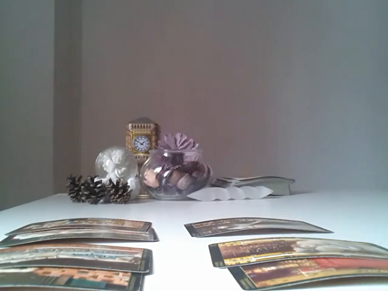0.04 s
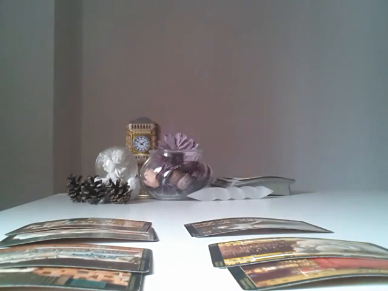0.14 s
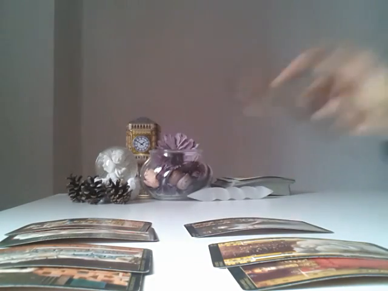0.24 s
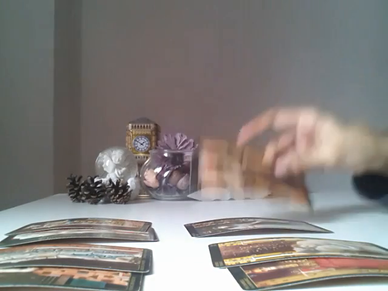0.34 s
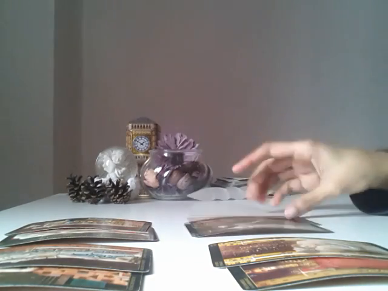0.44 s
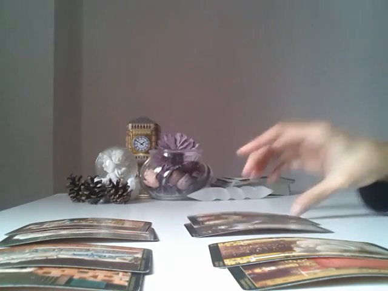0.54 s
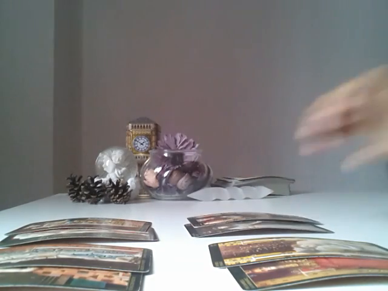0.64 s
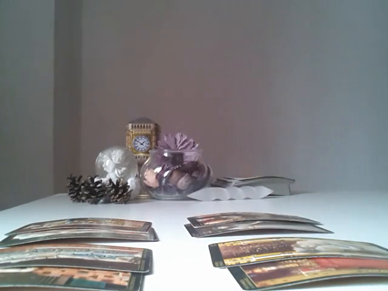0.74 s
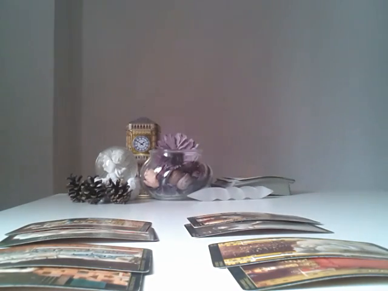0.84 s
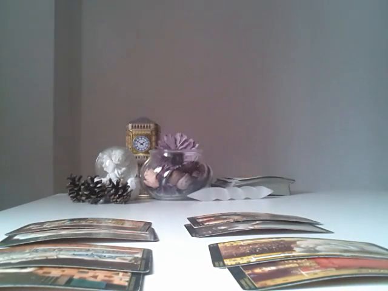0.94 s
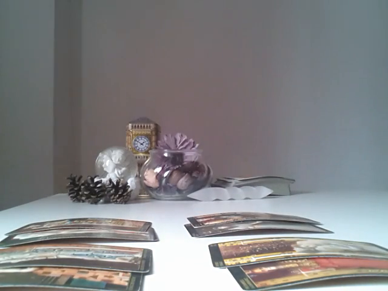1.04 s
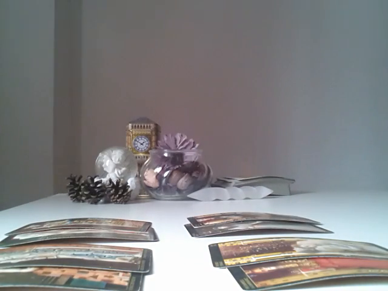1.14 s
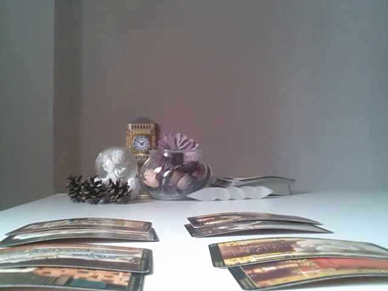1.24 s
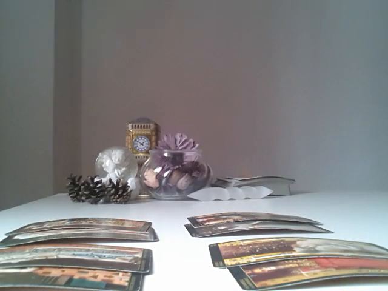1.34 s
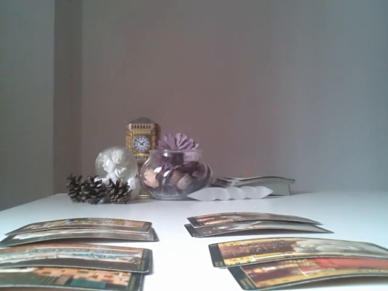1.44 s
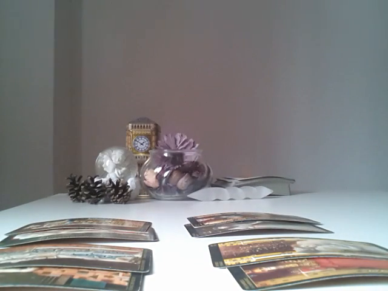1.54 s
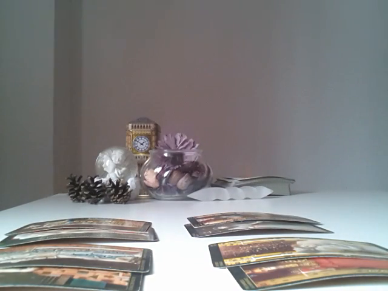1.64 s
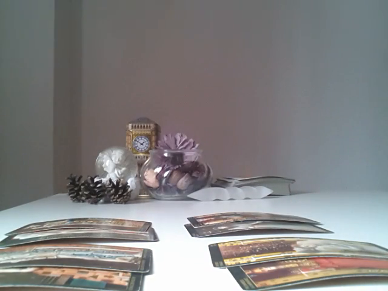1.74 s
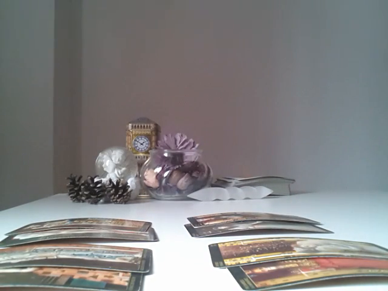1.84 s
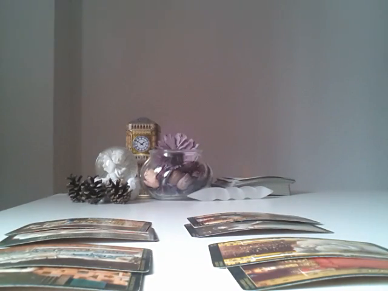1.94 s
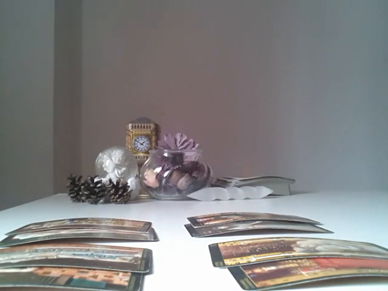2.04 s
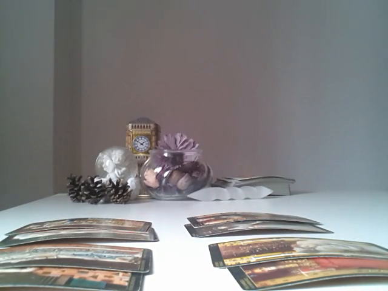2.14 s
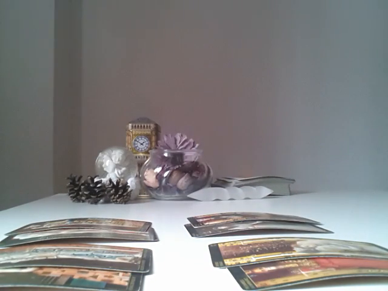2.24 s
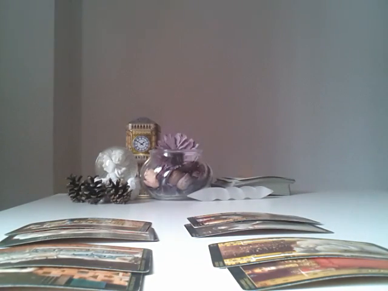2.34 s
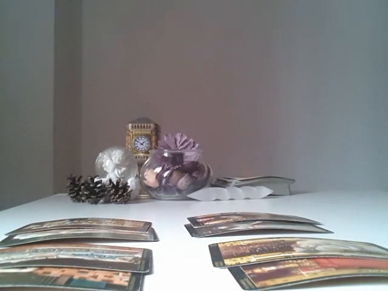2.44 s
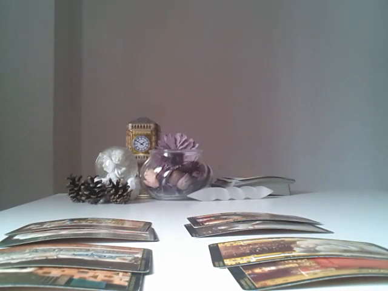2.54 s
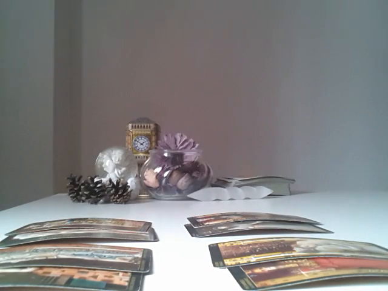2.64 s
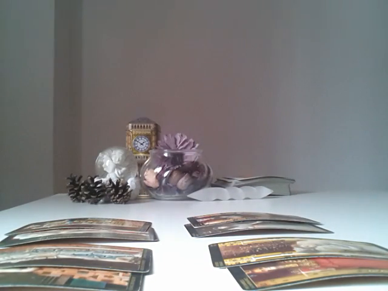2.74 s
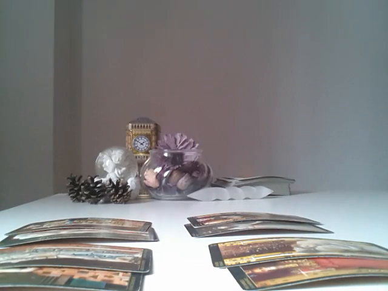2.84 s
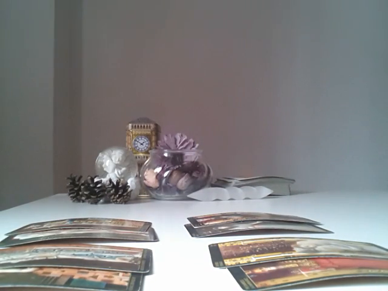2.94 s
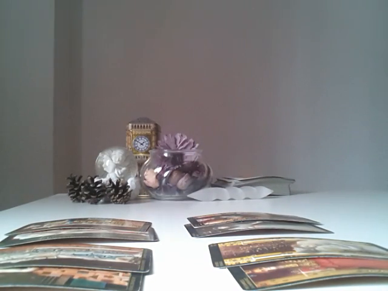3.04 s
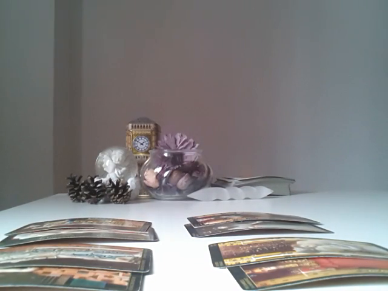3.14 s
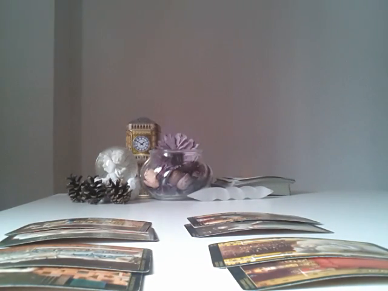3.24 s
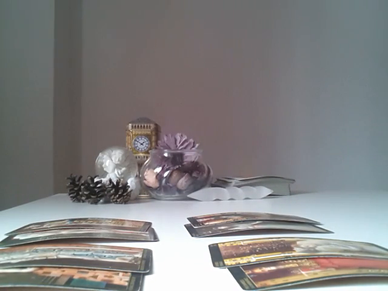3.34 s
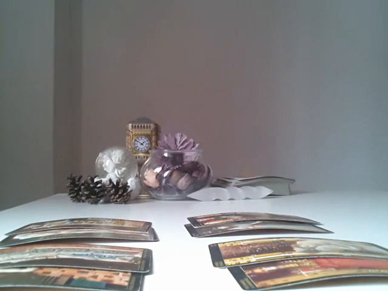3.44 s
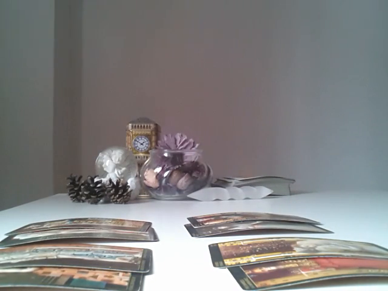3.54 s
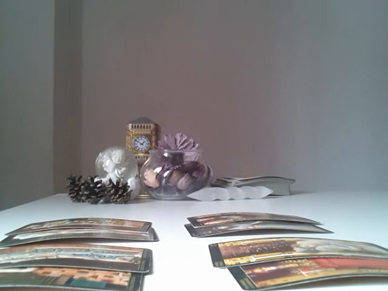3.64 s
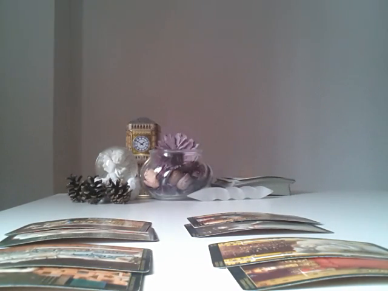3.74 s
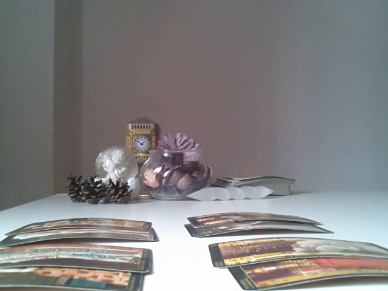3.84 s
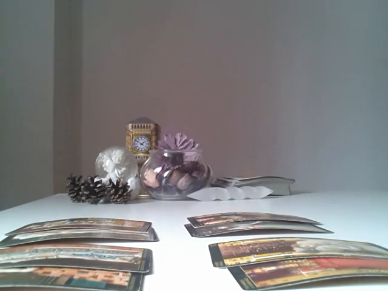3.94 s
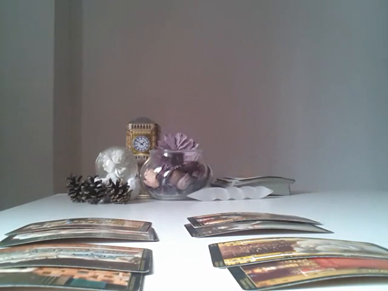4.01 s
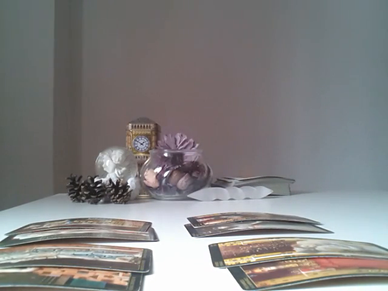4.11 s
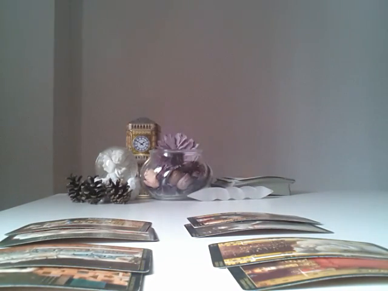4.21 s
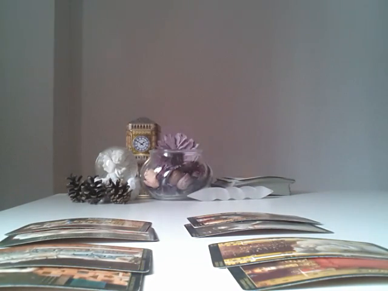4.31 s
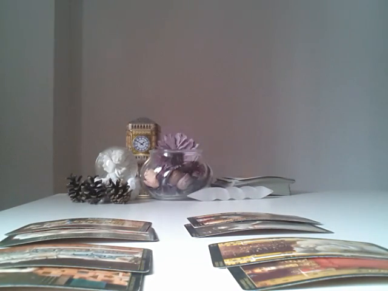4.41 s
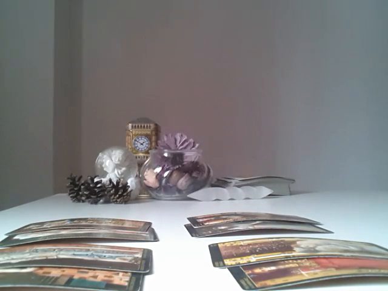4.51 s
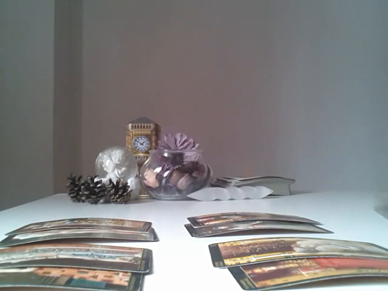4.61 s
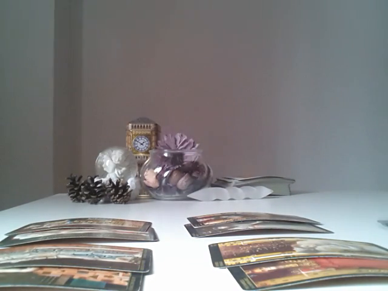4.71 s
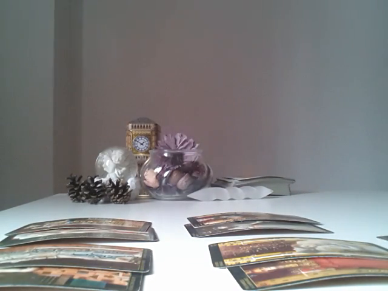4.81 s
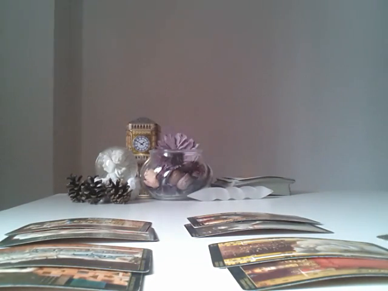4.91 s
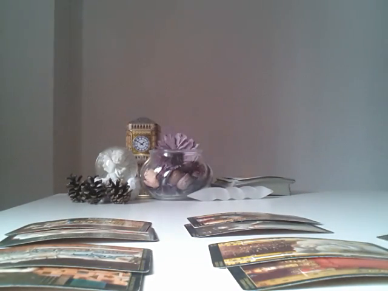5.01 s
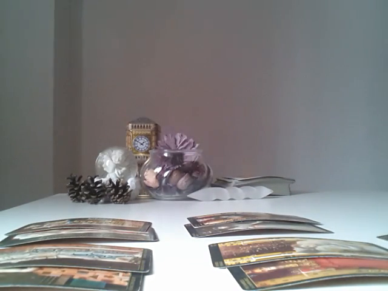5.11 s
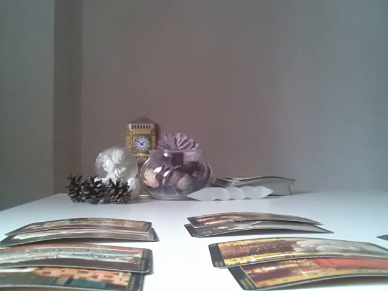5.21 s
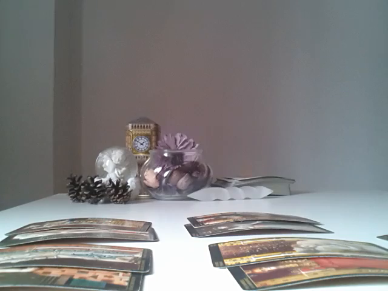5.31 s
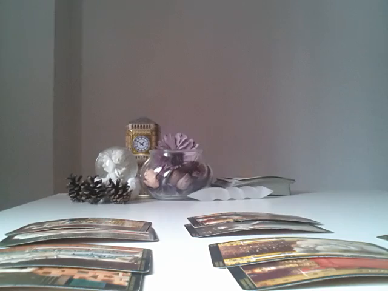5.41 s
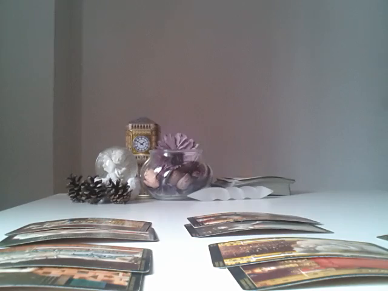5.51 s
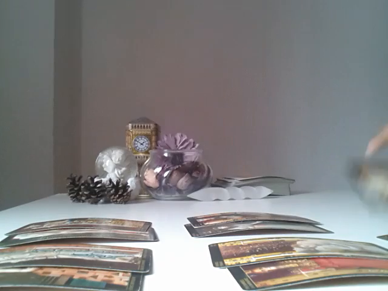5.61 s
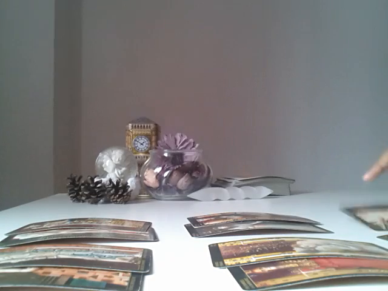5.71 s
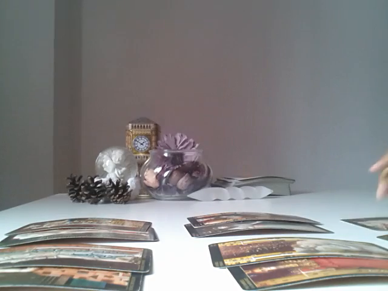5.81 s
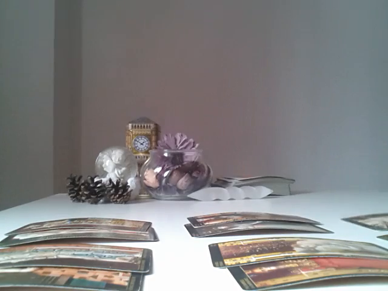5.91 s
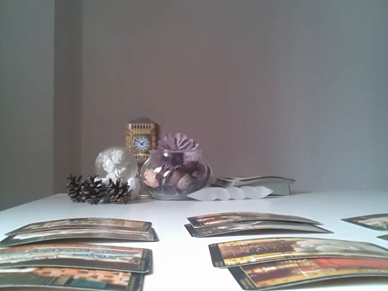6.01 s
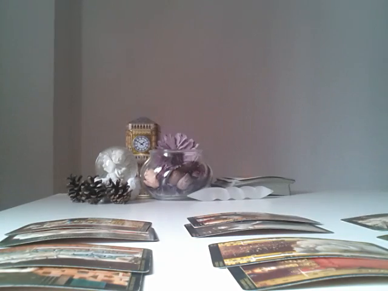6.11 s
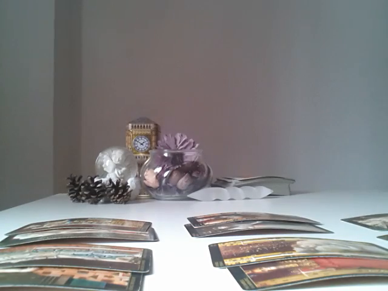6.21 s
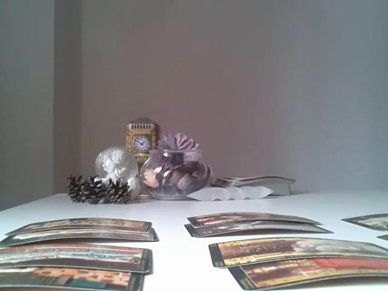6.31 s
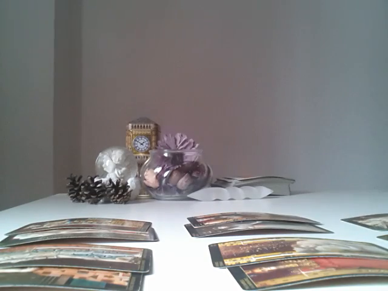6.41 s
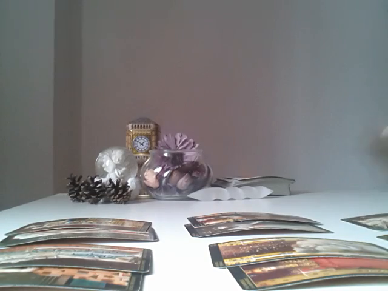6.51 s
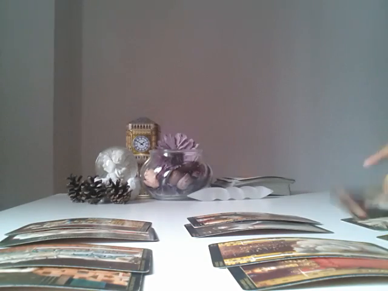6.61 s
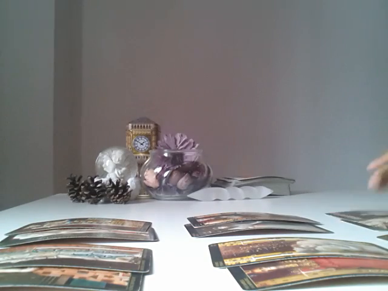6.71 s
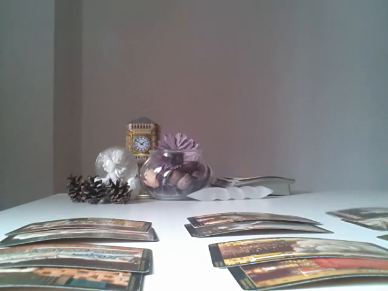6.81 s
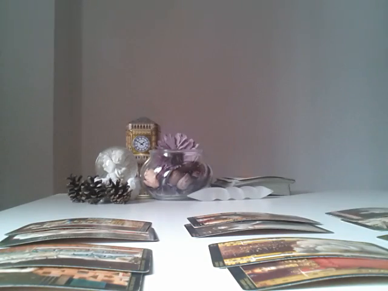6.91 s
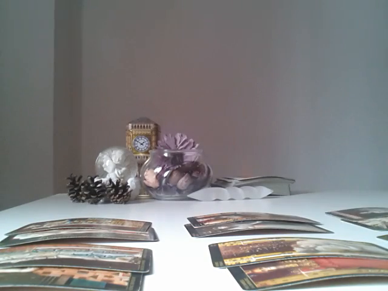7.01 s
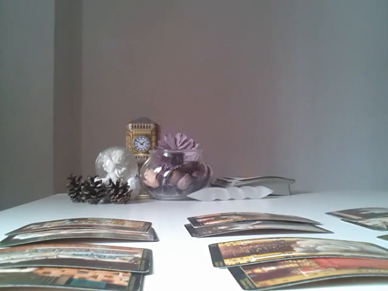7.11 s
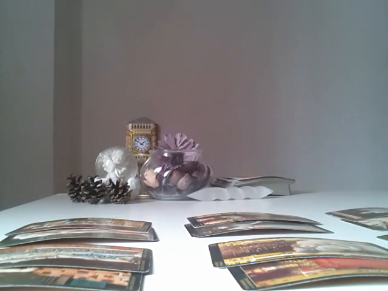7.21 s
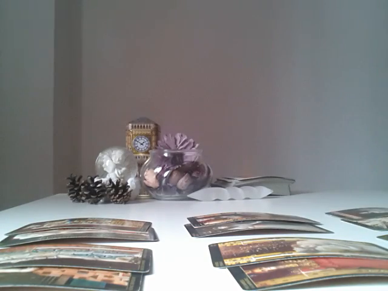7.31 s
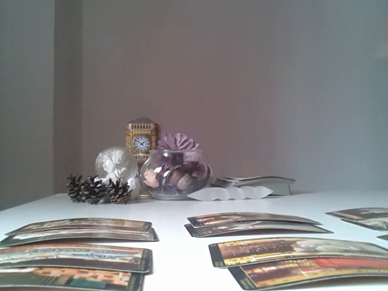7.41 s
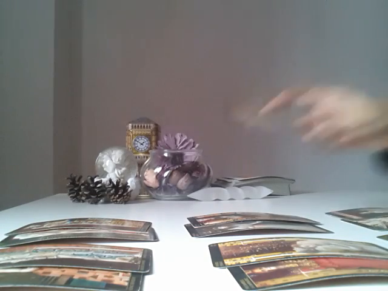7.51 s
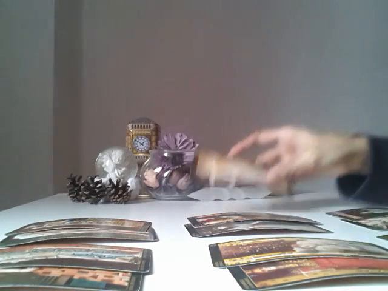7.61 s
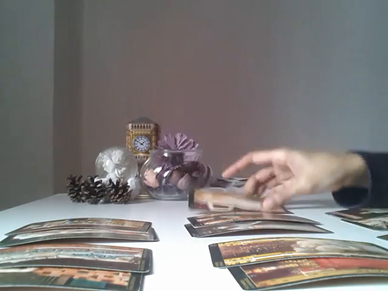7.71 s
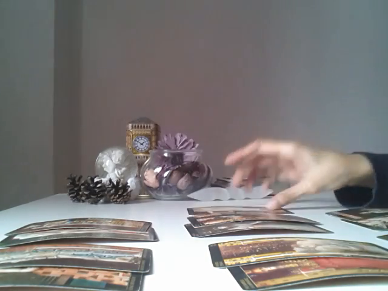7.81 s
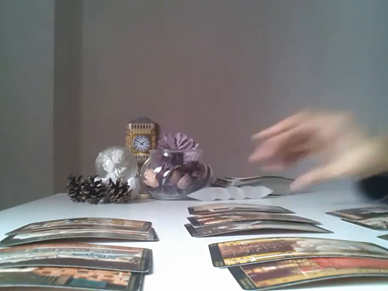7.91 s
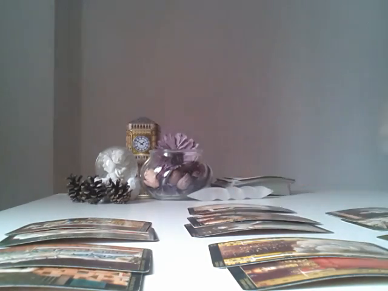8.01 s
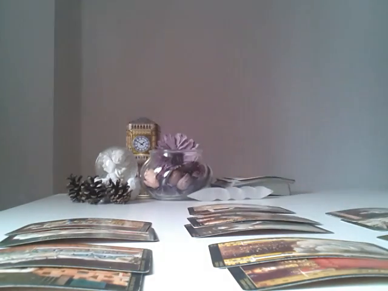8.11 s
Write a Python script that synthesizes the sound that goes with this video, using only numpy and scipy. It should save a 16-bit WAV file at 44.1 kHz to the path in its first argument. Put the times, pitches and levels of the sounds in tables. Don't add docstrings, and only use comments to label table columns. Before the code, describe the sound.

Stiff cards are drawn from a deck and laid on a hard table, with sharp snaps, papery scuffs and soft hollow knocks in a quiet small room.

```python
import sys
import numpy as np
from scipy import signal
from scipy.fft import rfft, irfft, next_fast_len
from scipy.io import wavfile
from scipy.ndimage import uniform_filter1d, minimum_filter1d

SR = 44100
rng = np.random.default_rng(int(sys.argv[2]) if len(sys.argv) > 2 else 0)


def wav_record(signal):
    frames = np.transpose(np.atleast_2d(signal))
    bounded = np.clip(frames, -1, 1)
    quanta = np.round(bounded * 32767).astype(np.int16)
    wavfile.write(sys.argv[1], SR, quanta)


def level_to_linear(level):
    exponent = np.asarray(level, float) / 20
    return 10 ** exponent


N = 359415

# freq_hz, level_db_per_hz
FLOOR_SPECTRUM = [(30, -11.5), (110, -48), (206, -21.5), (470, -14), (690, -18.5), (1430, -20.5),
                  (10800, -22.5), (16500, -22.5)]
# freq_hz, correlation
FLOOR_LIKENESS = [(60, 0.014), (300, 0.48), (1200, 0.51)]
# start_s, peak_db, pitch_hz, t60_s
KNOCKS = [
    (0.059, -35.5, 400, .03),
    (.073, -41.5, 422, .03),
    (1.428, -27.5, 370, 0.009),
    (2.36, -35, 470, .03),
    (2.388, -36.5, 438, 0.043),
    (2.43, -45.5, 456, 0.018),
    (3.782, -31.5, 478, .2),
    (3.83, -38.5, 446.6, .2),
    (4.428, -44.5, 425, 0.048),
    (5.36, -41, 445, 0.057),
]
# fastest_s, rub_db, cavity_hz, rise_ms_per_20db, fall_ms_per_20db
TABLE_SLIDES = [(.07, -43.5, 2500, 118, 79.4), (0.448, -33, 1800, 17, 86.4), (1.13, -55.5, 4930, 37, 120),
                (1.183, -35, 4800, 27, 35.3), (1.801, -40.5, 5900, 123, 40.3),
                (1.957, -43.5, 5100, 7.1, 35.19), (2.637, -41.5, 5800, 11, 205.2),
                (2.765, -44, 2300, 120, 64.8), (.51, -35.5, 6000, 74, 164),
                (3.262, -51.5, 5500, 9.7, 67.59), (3.361, -42.5, 2220, 41, 75.6),
                (3.692, -42, 2030, 36, 92.59), (3.78, -39, 2200, 9, 150), (4.654, -39, 1900, 22, 97),
                (4.77, -31.5, 2610, 28, 103), (5.353, -46, 3700, 10, 59.4), (5.387, -43.5, 4320, 45, 73.4),
                (5.698, -45.5, 2180, 36, 268), (5.932, -42, 1600, 12.3, 35.19),
                (6.337, -38, 2900, 29.4, 38.2), (6.62, -44.5, 3880, 15, 216), (6.698, -36, 2300, 11, 121),
                (7.294, -49, 5070, 49, 67.59), (7.76, -39.5, 3490, 46, 136)]
# fastest_s, rub_db, cavity_hz,
# rise_ms_per_20db, fall_ms_per_20db
DECK_SLIDES = [(0.424, -36.5, 2080, 4, 90), (3.16, -62, 6300, 37, 71), (.921, -58, 5900, 34, 36),
               (1.39, -54, 5500, 40, 150), (1.505, -43.5, 2200, 6, 170), (1.637, -43.5, 2200, 150, 140),
               (2.14, -65, 6600, 9.9, 90), (2.233, -53, 4850, 3.6, 98), (2.355, -36.5, 4750, 30, 17),
               (2.458, -40.5, 5270, 165, 22), (2.966, -53.5, 2350, 67, 40), (3.969, -49, 1540, 29, 58),
               (4.393, -44, 3075, 36, 120), (4.481, -45.5, 5020, 56, 49), (7.88, -40, 4000, 40, 128),
               (5.78, -42, 5200, 55, 60), (1.045, -64.5, 3020, 29, 62), (5.445, -39.5, 2760, 70, 51),
               (5.822, -37.5, 4660, 52, 30), (6.404, -42.5, 4040, 43, 32), (6.668, -41, 4000, 50, 30),
               (7.142, -59.5, 5450, 21, 68), (7.367, -45.5, 6300, 51, 32), (7.698, -40.5, 2710, 7.4, 246)]
# fastest_s, rub_db, cavity_hz, table_over_rub_db
SKIDS = [
    (0.11, -29.5, 3800, -10.5),
    (1.245, -31, 4630, -16.5),
    (1.503, -38, 2370, -22),
    (2.814, -32, 5500, -3),
    (3.467, -32.5, 3030, -4),
    (3.768, -30, 4100, 0.5),
    (6.691, -25.5, 5860, -4),
    (7.849, -34, 6270, -11),
]
# freq_hz, level_db_per_hz
RUB_SPECTRUM = [(530, -27.5), (900, -13.5), (1040, -11.5), (2600, -4), (3680, -9.5), (9310, -11.5),
                (14000, -26.5), (16000, -62.5)]
# pitch_hz, width_hz, level_db
TABLE_MODES = [(339.6, 60, -6), (462, 83, -0.5), (771, 405, 1), (964, 255, 4.5), (1453, 410, -0.5)]
# time_s, left_lags_right_us
HAND_PATH = [(.3, 340), (.4, 30), (.7, 30), (.9, 350), (3.55, 320), (3.65, 210), (4.9, 180), (5.3, 260),
             (5.6, 170), (6.2, 180), (6.3, 290), (6.55, 160), (7.4, 220), (7.6, 30), (7.85, -60)]
# start_s, peak_db, table_thud_db, ring_hz
SCUFFS = [(0.1127, -17, -9.5, 3200), (1.1837, -17.5, -9.5, 1950), (1.252, -27, -16, 7100),
          (2.35, -25.5, -12, 4670), (2.6431, -25, -12, 5800), (2.9129, -32.5, -32, 2015),
          (3.256, -31.5, -22, 5880), (3.356, -27.5, -10.5, 3220), (3.4075, -30.5, -8, 5230),
          (3.448, -39, -15, 5005), (3.4713, -21, -10, 2840), (3.766, -10.5, -33.5, 4240),
          (4.6521, -20.5, -3, 4670), (4.66, -27.5, -4.5, 2800), (4.764, -18, -7, 6100),
          (5.4384, -23, -14.5, 2300), (5.8159, -22.5, -1, 4600), (5.925, -31.5, -9, 5900),
          (5.939, -31.5, -9, 3700), (7.7335, -25, -6, 2500)]
# start_s, peak_db, table_thud_db, ring_hz
SNAPS = [(0.4205, -16, -13.5, 3710), (0.4365, -7, -6, 3200), (0.4513, -20.5, -16.5, 3100),
         (0.479, -5, -16, 2230), (0.496, -6.5, -9.5, 5300), (0.509, -19.5, -34.5, 6500),
         (1.2419, -27.5, -9.5, 3900), (1.5011, -25.5, -26, 2390), (1.637, -23, -15, 2620),
         (1.7439, -21.5, -17, 2700), (1.9503, -15.5, -22.5, 5700), (1.9559, -23.5, -11, 3000),
         (2.807, -5.5, -18.5, 2510), (2.956, -32.5, -11.5, 2400), (3.3829, -34.5, -8, 1980),
         (3.675, -27, -12.5, 4386), (3.686, -23.5, -10.5, 2750), (4.7051, -20.5, -1, 4510),
         (4.783, -9, -10, 5600), (5.6779, -18, -12.5, 2410), (5.6897, -22.5, -6, 3940),
         (5.8246, -24.5, -2, 4900), (6.3289, -26.5, -12.5, 3070), (6.6208, -18.5, -14.5, 1800),
         (6.628, -27.5, -7, 5000), (7.364, -26, -30, 6080), (7.6942, -14, -14, 3760),
         (7.722, -22, -6, 1850), (7.829, -26, -3.5, 2900), (2.801, -19.5, -14, 3990)]
# start_s, peak_db, table_thud_db, ring_hz, scatter_ms
CRACKS = [(0.501, -11, -4.5, 3400, 1.7), (1.4272, -18.5, -20, 2090, 2.2), (1.4978, -16, -20.5, 2500, 5.1),
          (1.8186, -14.5, -17, 3430, 5.8), (2.823, -13.5, -13, 5760, 4.5), (1.9692, -37, -13.5, 6500, 6.1),
          (2.6305, -3, -28, 5600, 0.87), (2.6572, -21, -13, 5200, 5.2), (2.6923, -59, -18, 2300, 7.1),
          (2.7055, -33.5, -5, 6300, 6.2), (3.398, -37.5, -15.5, 1900, 5), (3.737, -13, -29, 5050, 2.8),
          (3.756, -21, -50, 4200, 6.7), (3.7698, -2.5, -12.5, 4220, 2), (4.6252, -10.5, -21, 6900, 2.44),
          (4.7799, -9.5, -15, 2500, 6.9), (6.3395, -36.5, -15.5, 3000, 6.5),
          (6.6119, -19.5, -9.5, 3900, 6.1), (6.6788, -16.5, -14, 5460, 4.4), (6.6862, -13, -32, 2270, 4.7),
          (7.8421, -1.5, -19, 3060, 3), (7.8442, 0.5, -22.5, 6060, 0.84), (7.856, -6, -36.5, 6320, 5.5)]
# freq_hz, t60_s
ROOM_DECAY = [(200, 0.47), (1000, 0.29), (4000, 0.23), (12000, 0.33)]
# freq_hz, level_db
TREBLE_END = [(14400, -1), (14900, -29.5), (16400, -35.5), (16800, -120)]

SNAP_SCATTER_MS, SCUFF_SCATTER_MS = 12, 38
SKID_RISE_MS, SKID_FALL_MS = 21, 17.3
TABLE_SLIDE_DB, DECK_SLIDE_DB = -6.5, -14
LIFT = 0.19


def unit(x):
    return x / np.sqrt(np.mean(x ** 2) + 1e-20)


def along(points, hz):
    f, v = np.transpose(points)
    return np.interp(np.log(hz + 1), np.log(f + 1), v)


def hiss():
    m = next_fast_len(N)
    f = np.fft.rfftfreq(m, 1 / SR)
    angle = np.arccos(np.clip(along(FLOOR_LIKENESS, f), -1, 1)) / 2
    noise = rfft(rng.standard_normal((2, m))) * level_to_linear(along(FLOOR_SPECTRUM, f))
    mid, side = irfft(noise * [np.cos(angle), np.sin(angle)], m)[:, :N]
    return unit(np.array([mid + side, mid - side]))


def suppressor(x, open_db, depth_db, soft_db):
    power = np.abs(uniform_filter1d(np.mean(x ** 2, axis=0), size=200))
    held = -minimum_filter1d(-power, size=800, origin=-80)
    over = (10 * np.log10(held + 1e-12) - open_db) / soft_db
    gain_db = depth_db * (np.tanh(over) - 1) / 2
    return level_to_linear(uniform_filter1d(gain_db, size=100))


def knocks():
    t = np.arange(N) / SR
    rattle = level_to_linear(3 * unit(uniform_filter1d(rng.standard_normal(N), size=300)))
    notes = np.zeros(N)
    for start_s, peak_db, hz, t60_s in KNOCKS:
        decay = level_to_linear(peak_db - 60 * np.abs(t - start_s) / t60_s)
        notes -= decay * np.sin(2 * np.pi * hz * np.clip(t - start_s, 0, 1))
    return rattle * notes


def resonance(f, hz, width):
    return 1j * f * width / (hz * hz - f * f + 1j * f * width)


def table_top(f):
    return sum((-1) ** k * level_to_linear(db) * resonance(f, hz, width_hz)
               for k, (hz, width_hz, db) in enumerate(TABLE_MODES))


def placed(f, s):
    lag_us = np.interp(s, *np.transpose(HAND_PATH))
    shadow_db = -.02 * lag_us * f / (f + 900)
    half = level_to_linear(shadow_db / 2) * np.exp(-1j * np.pi * f * lag_us / 10 ** 6)
    return np.array([half, 1 / half])


def strokes(t):
    rows = [(*r, TABLE_SLIDE_DB) for r in TABLE_SLIDES]
    rows += [(*r, DECK_SLIDE_DB) for r in DECK_SLIDES]
    rows += [(s, db, hz, SKID_RISE_MS, SKID_FALL_MS, table_db) for s, db, hz, table_db in SKIDS]
    s, db, hz, rise_ms, fall_ms, table_db = [c[:, None] for c in np.transpose(rows)]
    side_ms = np.clip(np.where(t < s, rise_ms, fall_ms), 2, 900)
    fade = np.abs(t - s) * 1000 / side_ms
    power = level_to_linear(np.clip(db - 20 * fade * (1 + LIFT * fade), -200, 0)) ** 2
    rub = power.sum(0)
    table = (power * level_to_linear(table_db) ** 2).sum(0)
    return np.sqrt(rub), np.sqrt(table), (power * hz).sum(0) / rub


def slides():
    flutter_db = 2.4 * unit(uniform_filter1d(rng.standard_normal(N), size=130))
    catches = rng.standard_normal((4, N))
    catches *= level_to_linear(2.52 * rng.exponential(size=(4, N)) + flutter_db)
    f, t, z = signal.stft(catches, SR, nperseg=256)
    f = f[:, None]
    rub, table, gap_hz = strokes(t)

    patches = uniform_filter1d(rng.standard_normal(z.shape[1:]), size=5, axis=0)
    patches = uniform_filter1d(patches, size=7, axis=1)
    gap = level_to_linear(along(RUB_SPECTRUM, f) + 4.1 * unit(patches))
    gap = gap * (1 + 2.3 * np.abs(resonance(f, gap_hz, 1100)))
    gap /= np.sqrt(np.mean(gap ** 2, axis=0))

    through_gap = rub * unit(z[0] + 2.5 * z[2:]) * gap
    through_table = table * unit(unit(z[1] + 0.77 * z[3:1:-1]) * table_top(f))
    mix = through_gap + level_to_linear(-0.5) * through_table
    mix *= np.sqrt(np.mean(np.abs(z) ** 2) / np.mean(catches ** 2)) * level_to_linear(-14.5)
    return signal.istft(mix * placed(f, t), SR, nperseg=256)[1][:, :N]


def peak_one(z):
    return z / np.abs(irfft(z)).max(-1, keepdims=True)


def snaps():
    rows = CRACKS + [(*r, SNAP_SCATTER_MS) for r in SNAPS] + [(*r, SCUFF_SCATTER_MS) for r in SCUFFS]
    s, db, thud_db, ring_hz, ms = [c[:, None] for c in np.transpose(sorted(rows))]
    scatter_ms = np.clip(ms, 1, 80)
    size, lead = 4096, 64
    t, f = np.arange(size) / SR, np.fft.rfftfreq(size, 1 / SR)
    draw = rng.standard_normal((len(s), 5, size))

    kicks = 0.51 * (draw[:, 0] + draw[:, 3:].transpose(1, 0, 2))
    kicks = kicks * np.abs(draw[:, 1]) * level_to_linear(-60e3 * t / scatter_ms)
    kicks[..., :1] = -12 / scatter_ms
    card = resonance(f, 4000, 4800) * (0.27 + resonance(f, ring_hz, 0.21 * ring_hz))

    push = draw[:, 2] + 0.77 * draw[:, :2].transpose(1, 0, 2)
    push = push * level_to_linear(-60 * t / 0.012)

    z = peak_one(rfft(kicks) * card)
    z = z + level_to_linear(thud_db + 4.5) * peak_one(rfft(push) * table_top(f))
    delay_s = lead / SR + s % (1 / SR)
    z = level_to_linear(db - 1.0) * z * placed(f, s) * np.exp(-2j * np.pi * f * delay_s)
    out = np.zeros((2, N + size))
    starts = (s[:, 0] * SR).astype(int) - lead
    for k, wave in zip(starts, irfft(z).transpose(1, 0, 2)):
        out[:, k:k + size] += wave
    return out[:, :N]


def room(x):
    out, count = np.zeros((2, N)), 4
    turn = np.arange(N) // (SR // 16) % count
    for k in range(count):
        hz, t, z = signal.stft(rng.standard_normal((2, SR // 2)), SR, nperseg=256)
        decay = level_to_linear(-60 * t / along(ROOM_DECAY, hz)[:, None])
        tail = signal.istft(z * decay, SR, nperseg=256)[1]
        tail *= 1 - level_to_linear(-60 * np.arange(tail.shape[1]) / SR / 0.035)
        tail /= np.linalg.norm(tail[0])
        out += signal.fftconvolve((x * (turn == k))[None], tail, axes=1)[:, :N]
    return out


def scene():
    no_bass = signal.butter(3, 200, "high", fs=SR, output="sos")
    cards = signal.sosfilt(no_bass, snaps() + slides() + knocks())
    cards += level_to_linear(-10.0) * room(cards[1])
    gain = suppressor(cards, open_db=-48, depth_db=13, soft_db=6)
    return cards + level_to_linear(-53.5) * gain * hiss()


def band_limit(x):
    return signal.sosfilt(signal.butter(12, 16830, fs=SR, output="sos"), x)


def record(dry):
    m = next_fast_len(N)
    response = level_to_linear(along(TREBLE_END, np.fft.rfftfreq(m, 1 / SR)))
    heard = irfft(rfft(dry, m) * response, m)[:, :N]
    return band_limit(heard)


dry = scene()
out = record(dry)
wav_record(out)
```